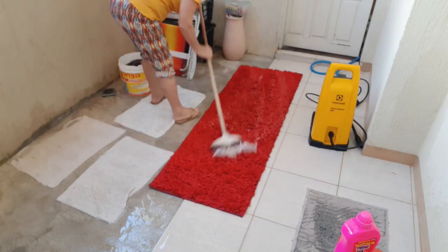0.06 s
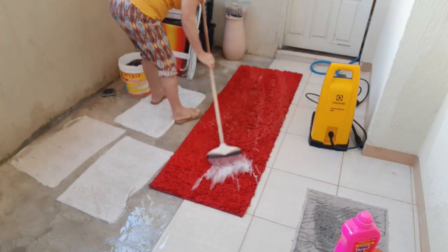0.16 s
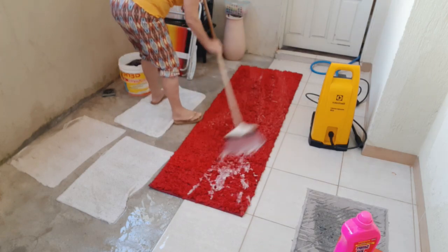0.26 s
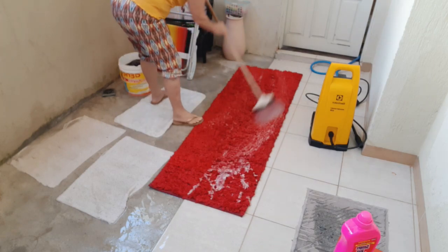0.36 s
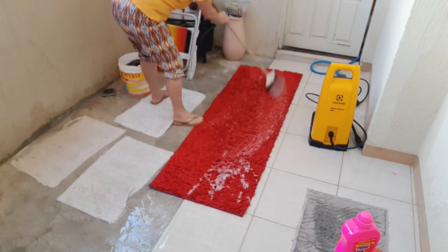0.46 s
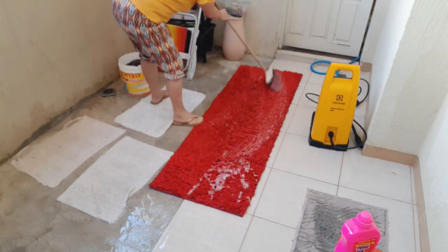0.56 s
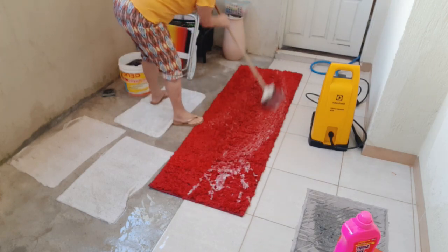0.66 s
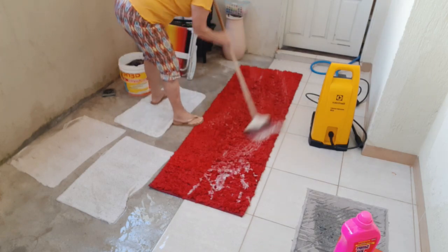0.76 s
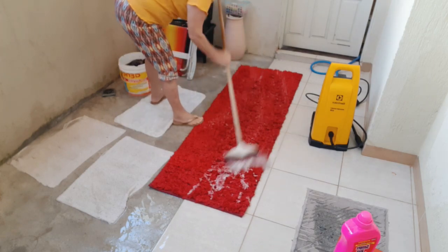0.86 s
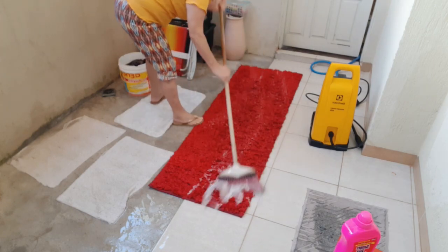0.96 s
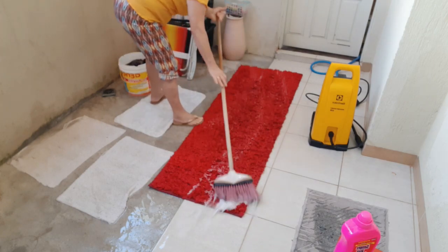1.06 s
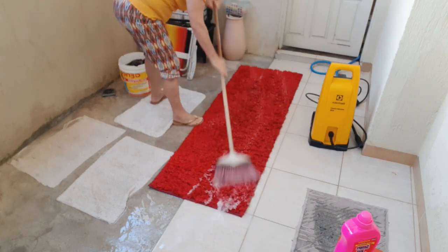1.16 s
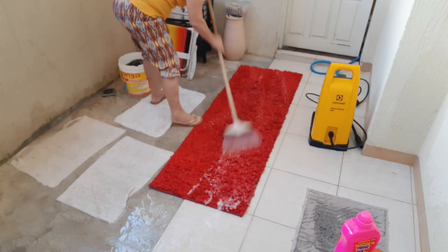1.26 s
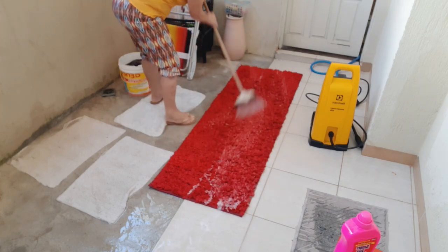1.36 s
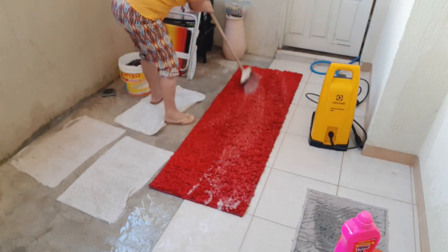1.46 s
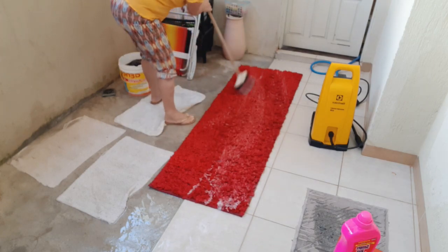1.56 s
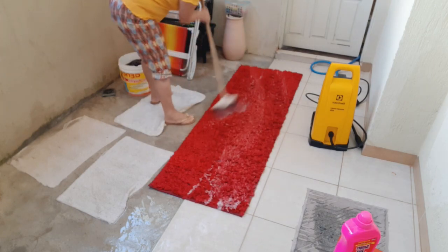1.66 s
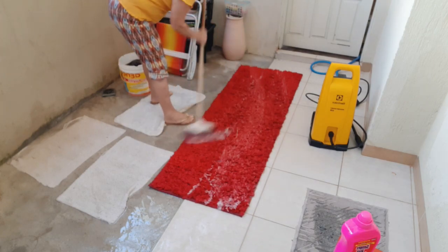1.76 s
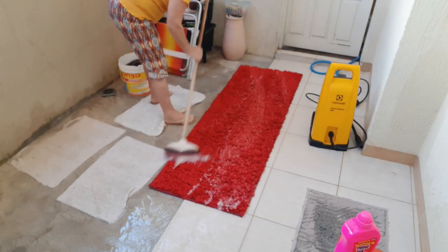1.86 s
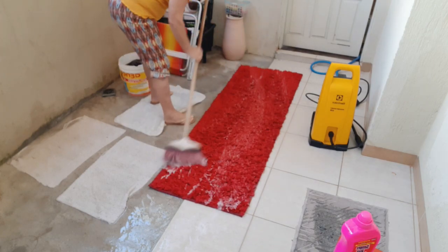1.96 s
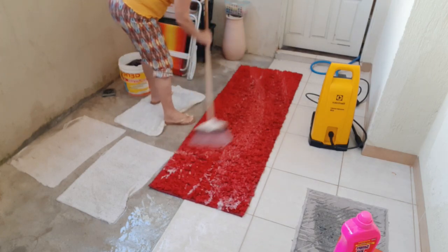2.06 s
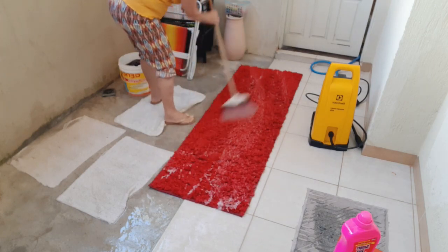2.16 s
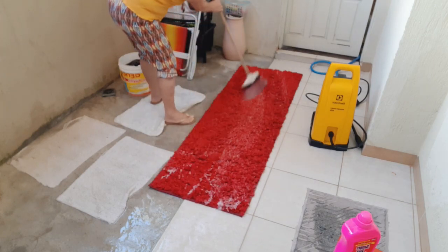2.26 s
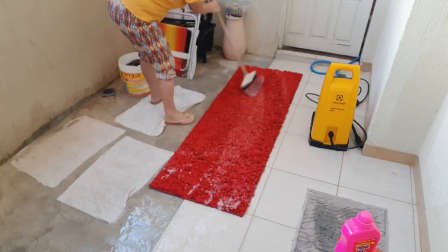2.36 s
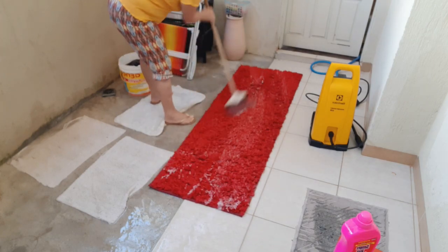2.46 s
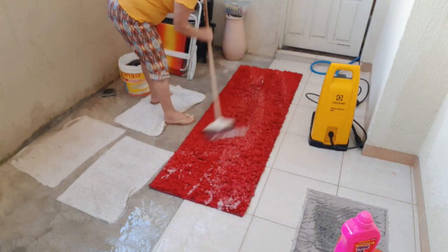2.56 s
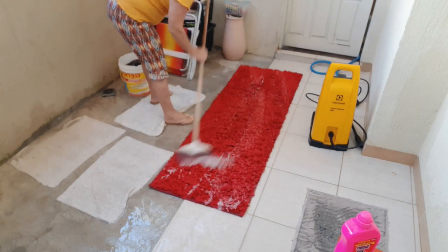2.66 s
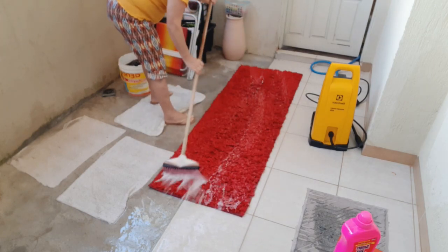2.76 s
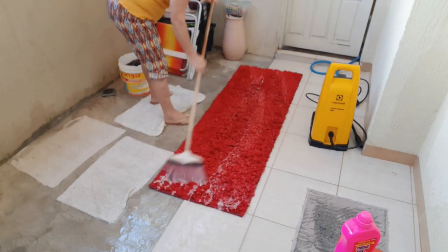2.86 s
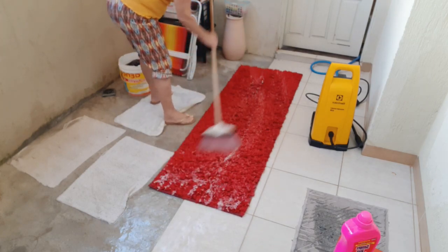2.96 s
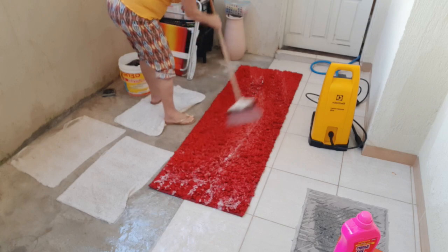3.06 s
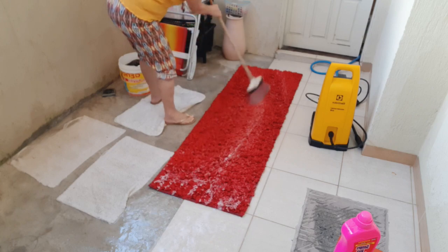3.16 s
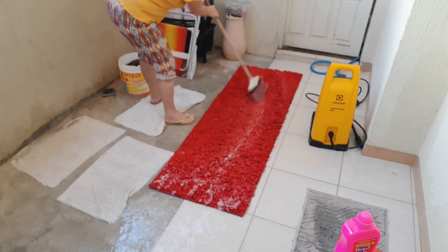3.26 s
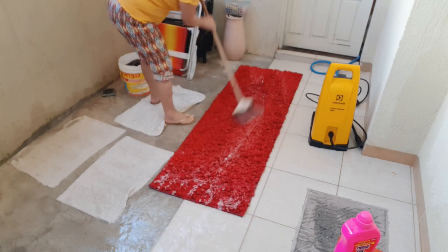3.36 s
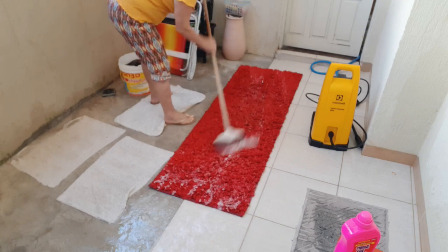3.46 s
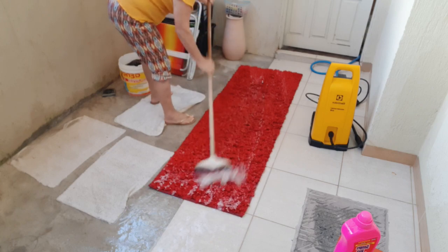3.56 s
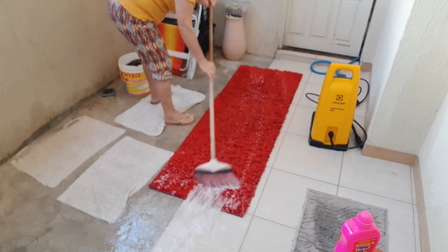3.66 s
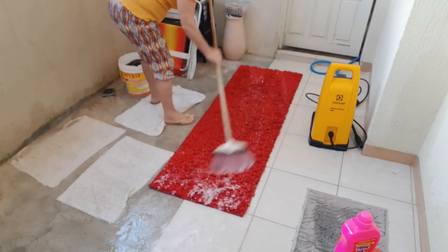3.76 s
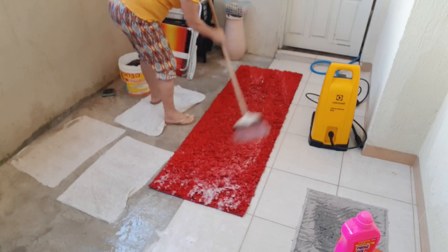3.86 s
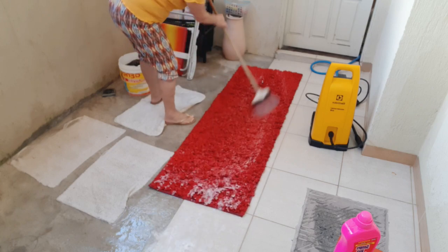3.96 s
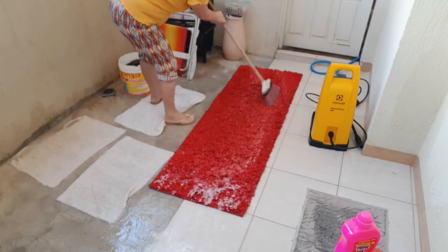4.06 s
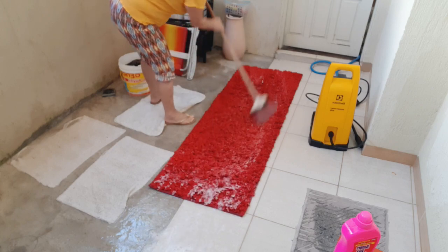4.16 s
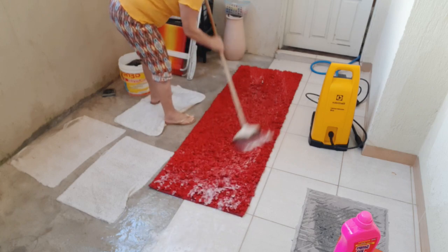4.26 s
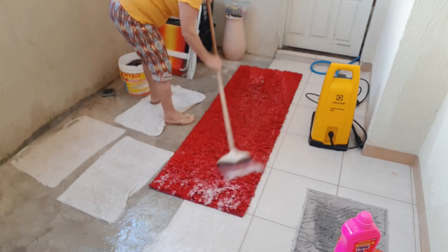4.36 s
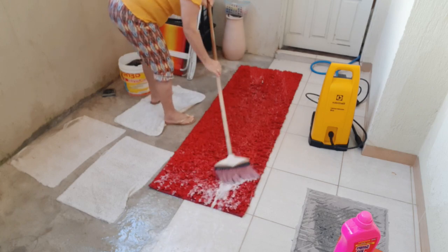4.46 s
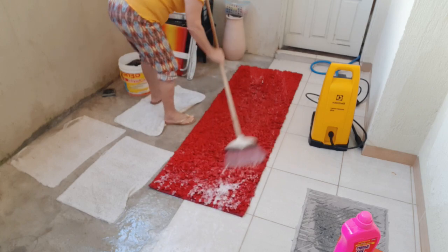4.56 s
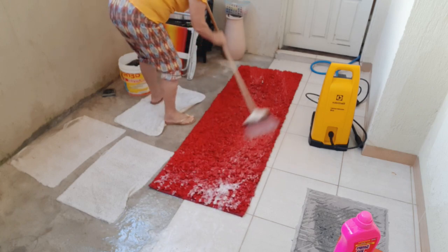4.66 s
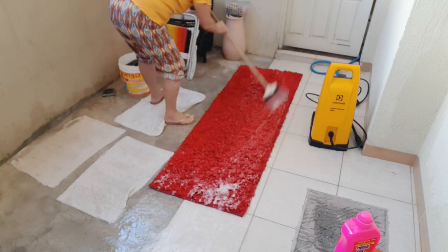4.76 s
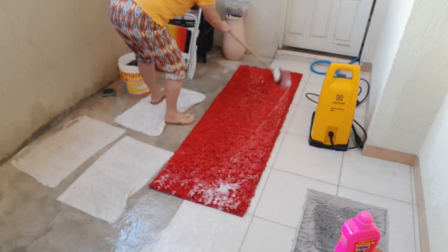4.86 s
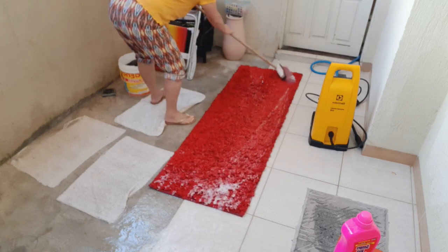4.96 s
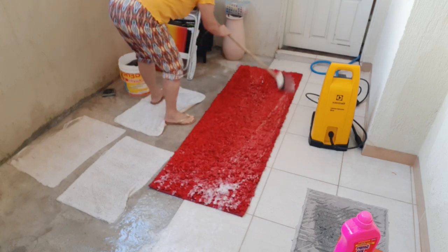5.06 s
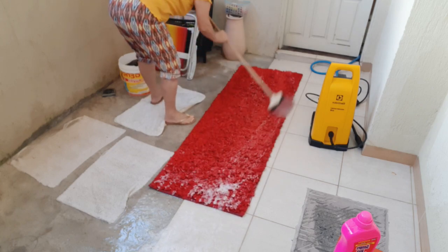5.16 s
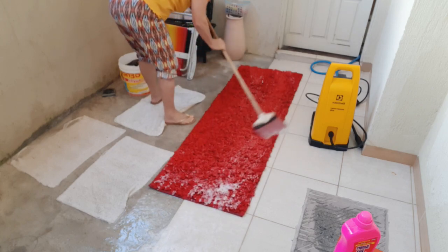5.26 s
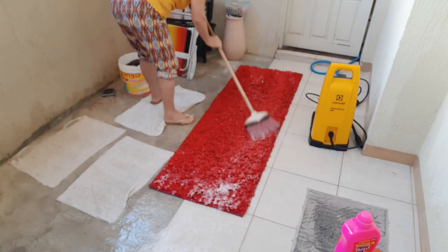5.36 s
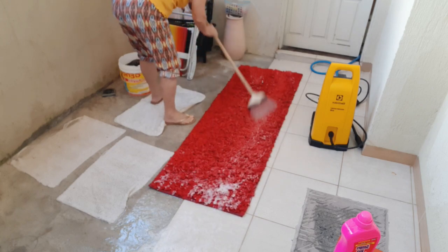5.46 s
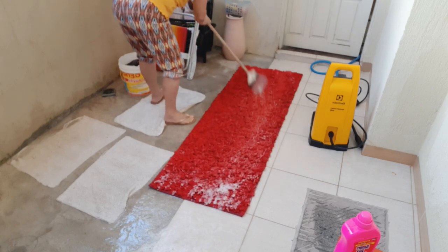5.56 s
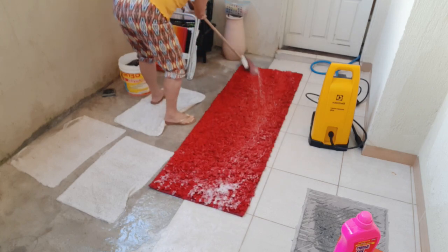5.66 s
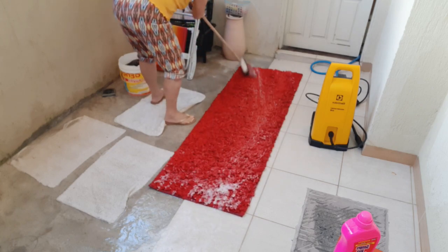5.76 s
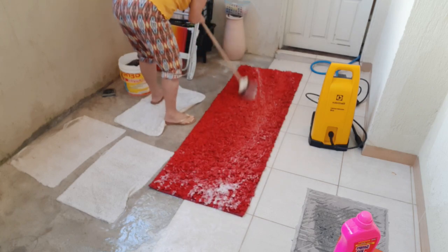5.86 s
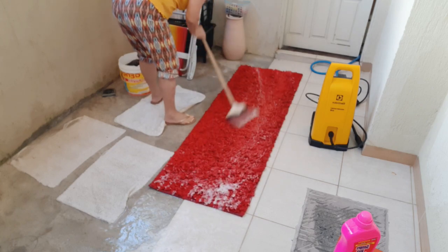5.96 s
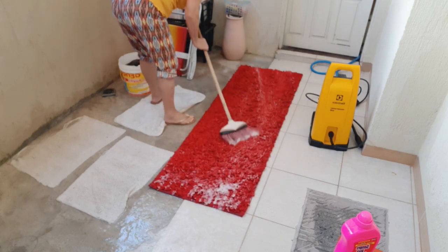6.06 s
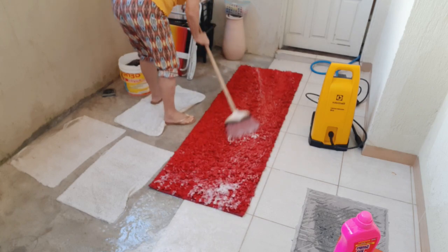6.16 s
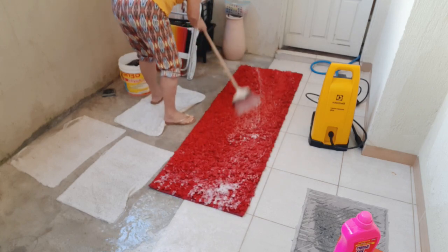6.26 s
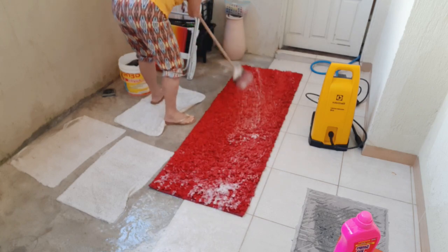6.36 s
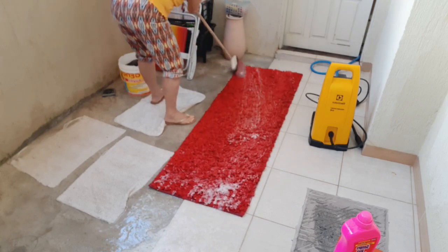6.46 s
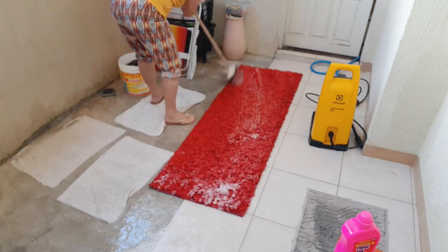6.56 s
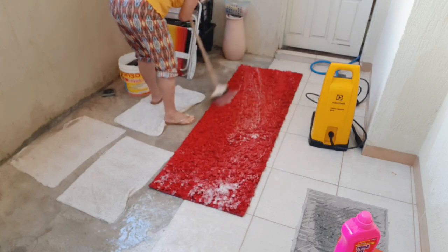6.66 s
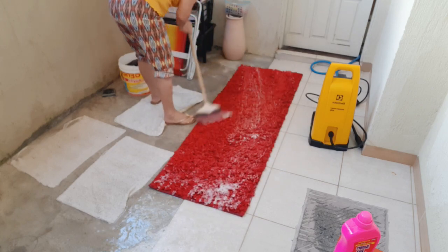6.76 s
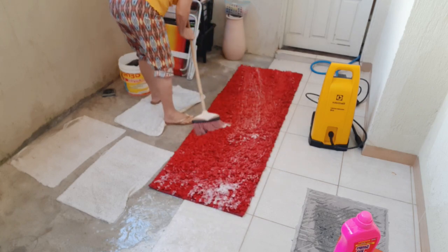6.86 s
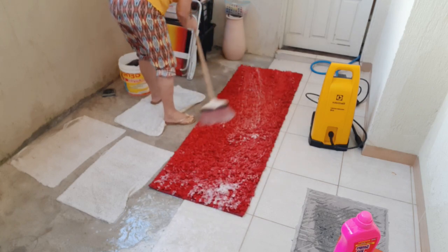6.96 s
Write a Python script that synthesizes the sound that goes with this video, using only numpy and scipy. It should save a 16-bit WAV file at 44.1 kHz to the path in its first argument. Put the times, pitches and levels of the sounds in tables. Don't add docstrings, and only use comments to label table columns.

```python
import sys
import numpy as np
from scipy import signal
from scipy.fft import rfft, irfft, next_fast_len
from scipy.io import wavfile
from scipy.ndimage import uniform_filter1d

SR = 44100
rng = np.random.default_rng(int(sys.argv[2]) if len(sys.argv) > 2 else 0)


def int16_out(signal):
    q = np.round(np.clip(np.atleast_2d(signal).T, -1, 1) * 32767)
    wavfile.write(sys.argv[1], SR, q.astype(np.int16))


def attenuation_scalar(level_db):
    decades = np.asarray(level_db, float) / 20
    return 10 ** decades


N = 308700
SIZE, HOP = 1024, 256
HZ = np.fft.rfftfreq(SIZE, 1 / SR)
# [f/Hz, correlation]
LIKENESS = [(60, 0.89), (130, 0.98), (290, 0.82), (450, 0.9), (640, 0.18), (900, 0.0076), (1410, -0.0059),
            (15000, 0.017)]


def evened(x):
    return x / np.sqrt(np.mean(x ** 2) + 1e-20)


def read(points, hz=HZ):
    f, value = np.transpose(points)
    return np.interp(np.log(hz + 1), np.log(f + 1), value)


def colour(points):
    return evened(attenuation_scalar(read(points)))[:, None]


def two_microphones(left, other, likeness):
    return np.array([left, likeness * left + np.sqrt(1 - likeness ** 2) * other])


def sound(z):
    return signal.istft(z, nperseg=SIZE, noverlap=SIZE - HOP)[1][:, :N]


def strokes(t):
    # [top speed t/s, speed-up/s, slow-down/s, effort level/dB, weight/dB]
    pulls = [
        (.01, 0.23, .23, -32.5, 1.5),
        (.8, 0.21, 0.37, -29.5, 0.5),
        (1.78, 0.28, 0.23, -32, 1),
        (2.6, 0.24, 0.27, -33, 3.5),
        (3.5, 0.18, 0.24, -32, 3.5),
        (4.34, 0.19, 0.19, -31, 0.5),
        (5.22, 0.17, 0.19, -32.5, -1),
        (5.96, 0.19, .24, -32.5, 2),
        (6.69, 0.13, 0.29, -31.5, 1),
    ]
    # [top speed t/s, speed-up/s, slow-down/s, effort level/dB, weight/dB]
    pushes = [
        (.41, 0.21, 0.16, -33, -2.5),
        (1.39, 0.25, 0.2, -36, 2.5),
        (2.21, 0.23, 0.16, -35.5, 0.5),
        (3.12, 0.23, 0.18, -36, 0.5),
        (3.96, 0.23, 0.18, -36, 0.5),
        (4.8, 0.26, 0.25, -34, 0),
        (5.62, 0.23, .2, -34, -2.5),
        (6.38, 0.21, 0.19, -36.5, 1.5),
    ]
    # [level over effort/dB, power of speed, gain along stroke/dB, share of weight]
    pull_layers = [
        (-0.1, 0.96, -2.5, 0.3),
        (-1.16, 0.99, -1, 0.64),
        (-9.5, 1.26, 1, 1.5),
        (-5, 0.82, -4.5, -0.26),
        (-19.5, 1.6, 1.5, 0.78),
    ]
    push_layers = [
        (0.07, 0.93, 2.5, 0.26),
        (2.5, 1.36, -2.1, 0.53),
        (-8.5, 1.24, -1.8, 1.05),
        (-5.5, 0.97, 6, -.2),
        (-16, 2.1, -1.5, 0.69),
    ]
    pull_stiffness = (1.016, 0.065)
    push_stiffness = (0.96, .03)
    turning_db = [-46.5, -48.5, -55.5, -48, -58]
    # [t/s, half length/s, hiss/dB, drone/dB, squelch/dB]
    digs = [(.84, 0.032, 2.5, -3, 1.5), (.94, 0.052, -1.5, -0.2, 0.5), (1.55, .035, -10, -3, -.4),
            (1.775, 0.028, 2.5, -2, 5.5), (2.666, 0.054, 1.1, 1, 0.5), (3.425, 0.027, 1.5, .3, -4),
            (4.336, 0.066, 1.3, -0.5, 2.5), (4.94, .05, 1.5, -.6, 2), (5.6, 0.055, 0.7, 0, 5),
            (6.416, 0.059, 0.7, 0.8, 3.5), (6.83, .07, 0.6, -2, -3)]
    spray_share = 0.66

    power = attenuation_scalar(turning_db)[:, None] ** 2 + 0 * t
    bend = 0.00091 + 0 * t
    total = 1e-3 + 0 * t
    ways = ((pulls, pull_layers, pull_stiffness), (pushes, push_layers, push_stiffness))
    for rows, layers, (stiff, stiffen) in ways:
        over_db, steep, along_db, share = np.transpose(layers)[:, :, None]
        for top, up, down, effort_db, weight_db in rows:
            along = np.clip((t - top) / np.where(t < top, up, down), -1, 1)
            speed = abs(np.cos(np.pi / 2 * along))
            gain_db = effort_db + over_db + along_db * along + share * weight_db
            power += (speed ** steep * attenuation_scalar(gain_db)) ** 2
            bend += speed * (stiff + stiffen * along)
            total += speed
    level_db = 10 * np.log10(power)
    for s, half, *gains_db in digs:
        gains_db = gains_db + [spray_share * gains_db[0]]
        level_db[:4] += np.outer(gains_db, np.exp(-((t - s) / half) ** 2))
    return level_db, bend / total


def flicks(per_s, spread_db):
    size_db = spread_db * np.minimum(rng.exponential(1, (2, N)), 3)
    size = attenuation_scalar(size_db) * rng.choice([-1., 1.], (2, N))
    ticks = evened(size * (rng.random((2, N)) < per_s / SR))
    left, other = signal.stft(ticks, nperseg=SIZE, noverlap=SIZE - HOP)[2]
    return two_microphones(left, other, np.clip(read(LIKENESS), -1, 1)[:, None])


def patches(frames, bins, span):
    field = rng.standard_normal((frames, len(HZ))).T
    return evened(uniform_filter1d(uniform_filter1d(field, bins, 0), span, 1))


def flung_foam(t):
    # [t/s, level/dB, rise/s, t60/s]
    flings = [
        (1.04, -41, .04, 1.1),
        (1.38, -33, .04, .25),
        (1.77, -28.5, .02, .5),
        (1.96, -36, 0.025, .9),
        (2.41, -29.5, 0.038, 0.43),
        (2.86, -42, .03, 1.2),
        (3.71, -43, 0.023, 0.97),
        (4.9, -38, .04, 0.55),
        (5.679, -23, 0.012, 0.64),
        (6.93, -41, .03, 1.2),
    ]
    # [f/Hz, level/dB]
    foam_colour = [(2500, -30), (4500, -1.5), (7800, -3.5), (8800, -11), (11000, -3), (13000, 0),
                   (16000, -3)]
    power = 0
    for start, db, rise, t60 in flings:
        fade_db = -60 * np.maximum(t - start - rise, 0) / t60
        swell = np.clip((t - start) / rise, 0, 1) * attenuation_scalar(db + fade_db)
        power = power + (colour(foam_colour) * swell) ** 2
    return power


def brush(t, patchy_db=0.58, judder_db=0.54):
    # [f/Hz, level/dB]
    hiss_colour = [(1200, -26), (2200, -0.5), (2800, -0.5), (4300, 0), (6000, -3), (8000, -5.5),
                   (8550, -15), (10000, -18), (12000, -18.5)]
    drone_colour = [(400, -45), (650, -9.5), (900, -2.5), (1200, -1), (1600, 0), (2100, -2.5), (2600, -6),
                    (4000, -23.5)]
    squelch_colour = [(180, -39), (270, -12), (340, -4.5), (450, 0), (600, 1.5), (750, 3), (1200, -26)]
    spray_colour = [(6000, -8), (8800, -3.5), (10000, 2), (11800, 7.5), (13500, 4), (14800, 5.5),
                    (15700, 2)]
    (hiss, drone, squelch, spray, _), stiffness = strokes(t)
    power = (colour(hiss_colour) * attenuation_scalar(hiss + 2.0)) ** 2
    shifted = attenuation_scalar(read(drone_colour, HZ[:, None] / np.clip(stiffness, .6, 1.6)))
    shifted = shifted / np.sqrt((shifted ** 2).mean(0))
    power += (shifted * attenuation_scalar(drone + 0.35)) ** 2
    power += (colour(squelch_colour) * attenuation_scalar(squelch - 0.2)) ** 2
    power += (colour(spray_colour) * attenuation_scalar(spray + 3.5)) ** 2
    power += flung_foam(t)
    judder = evened(uniform_filter1d(rng.standard_normal(len(t)), size=5))
    uneven_db = patchy_db * patches(len(t), bins=14, span=9) + judder_db * judder
    return power * attenuation_scalar(uneven_db) ** 2


def groans(damping=0.078):
    presses = [(0.949, 0.06, 453, -49), (1.794, 0.1, 441, -48), (2.679, 0.096, 429.4, -43),
               (3.449, 0.056, 422, -52), (3.64, 0.042, 448, -41.5), (6.057, 0.049, 457.4, -50),
               (0.923, 0.11, 56, -69), (1.853, 0.27, 55, -61), (2.557, 0.22, 55, -63),
               (3.496, 0.12, 55, -68), (4.801, 0.089, 55, -66), (2.195, 0.11, 55, -63),
               (4.311, .16, 55, -68), (5.94, 0.17, 55, -68), (6.8, 0.11, 55, -68)]
    out = np.zeros(N)
    t = np.arange(SR) / SR - .5
    for middle, half, hz, db in presses:
        keep = np.exp(-np.pi * damping * hz / SR)
        a, b = rng.standard_normal((SR, 2)).T
        slow = signal.lfilter([1], [1, -keep], a + 1j * b)
        slow /= np.sqrt(abs(slow))
        tone = evened((slow * np.exp(2j * np.pi * hz * t)).real)
        groan = attenuation_scalar(db) * np.exp(-(t / half) ** 4) * tone
        start = round((middle - .5) * SR)
        part = out[start:start + SR]
        part += groan[:len(part)]
    return out * attenuation_scalar(np.array([[-1.5], [1.5]]))


def rumble():
    # [f/Hz, level/dB]
    thud_colour = [(25, -40), (40, -30), (48, -17), (55, -9), (62, -3.5), (80, -1.5), (100, -12),
                   (125, 1.7), (145, -1.5), (240, -1.5), (320, -10.5), (500, -23)]
    hz = np.fft.rfftfreq(N, 1 / SR)
    left, other = rfft(rng.standard_normal((N, 2)).T)
    z = two_microphones(left, other, np.clip(read(LIKENESS, hz), -1, 1))
    z *= attenuation_scalar(read(thud_colour, hz))
    t = np.arange(0, N, HOP) / SR
    level_db = strokes(t)[0][-1]
    return evened(irfft(z, N)) * attenuation_scalar(np.interp(np.arange(N) / SR, t, level_db))


def walls(power):
    # [f/Hz, t60/s]
    decay_times = [(100, 0.72), (1000, 0.18), (4000, 0.39), (14000, 0.092)]
    keep = attenuation_scalar(-60 * HOP / SR / read(decay_times)) ** 2
    return np.array([signal.lfilter([0, 1 - k], [1, -k], band) for k, band in zip(keep, power)])


def porch(x, ripple_db=4.0):
    # [f/Hz, width/Hz, left level/dB, right level/dB]
    standing_notes = [
        (55, 9.4, 8, 0),
        (141, 19, 1, 1),
        (290.6, 11, 5.5, 7),
        (314.6, 31, 3, 5),
        (442.4, 14, 3, 5.5),
        (660, 22, 5, -2),
        (834, 70, 5, 1),
        (1120, 18, 5, 0.5),
        (1513, 43, 6, 5.5),
        (2049, 23, 6, 6.5),
    ]
    # [f/Hz, level/dB]
    balance = [(60, -5.5), (110, -4.5), (200, -3), (380, -0.5), (700, -2.5), (1290, -4), (2380, -2.5),
               (4400, -2.5), (8120, -1.0), (15000, -2)]
    size = next_fast_len(N + SR)
    hz = np.fft.rfftfreq(size, 1 / SR)
    gain = attenuation_scalar(np.outer([.5, -.5], read(balance, hz))) + 0j
    modes = evened(uniform_filter1d(rng.standard_normal((2, len(hz))), size=160))
    gain *= attenuation_scalar(ripple_db * hz / (hz + 700) / (1 + hz / 5000) * modes)
    for centre, width, left_db, right_db in standing_notes:
        resonance = 1 / (1 + 2j * (hz - centre) / width)
        gain *= 1 + np.outer(attenuation_scalar(np.array([left_db, right_db])) - 1, resonance)
    return irfft(rfft(x, size) * gain, size)[:, :N]


def air():
    # [f/Hz, level/dB]
    air_colour = [(150, -40), (240, -20), (300, 7), (1040, -21), (1520, -7), (7950, 7.5), (8550, -5),
                  (12000, -6), (15700, 2)]
    return flicks(per_s=22000, spread_db=6.5) * colour(air_colour) * attenuation_scalar(-46)


def scene():
    near = flicks(per_s=16000, spread_db=2.5)
    power = brush(np.arange(near.shape[2]) * HOP / SR)
    direct = near * np.sqrt(power)
    echo = flicks(per_s=30000, spread_db=0.1) * np.sqrt(walls(power))
    scrubbing = sound(attenuation_scalar(-1.21) * direct + attenuation_scalar(-6.5) * echo + air())
    return porch(scrubbing + rumble() + groans())


def roll_off(x):
    return signal.sosfilt(signal.butter(12, 15760, fs=SR, output="sos"), x)


def record(dry):
    bass_cut = signal.butter(8, 47, "high", fs=SR, output="sos")
    return roll_off(signal.sosfilt(bass_cut, dry))


dry = scene()
out = record(dry)
int16_out(out)
```